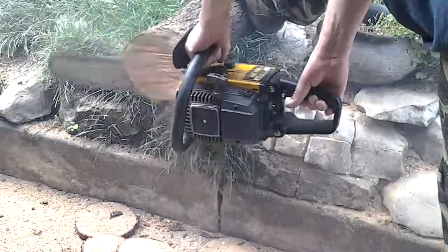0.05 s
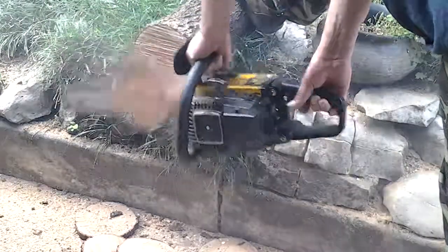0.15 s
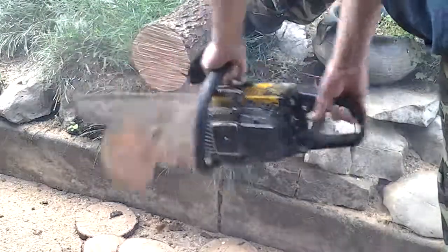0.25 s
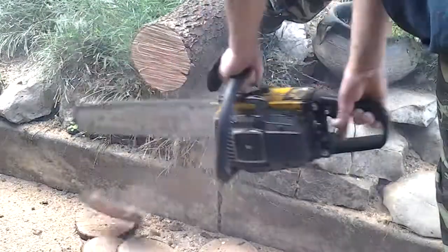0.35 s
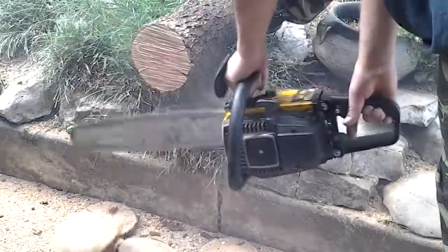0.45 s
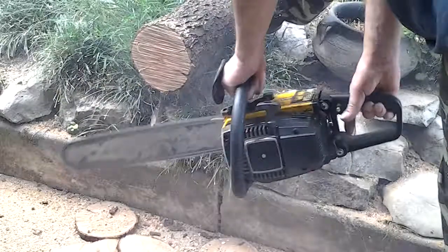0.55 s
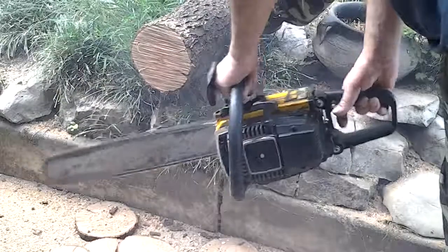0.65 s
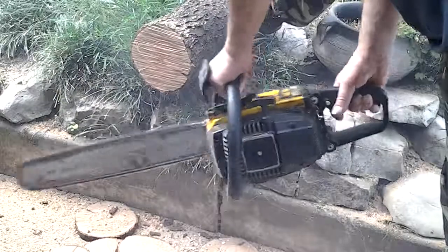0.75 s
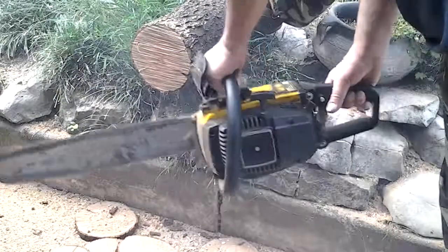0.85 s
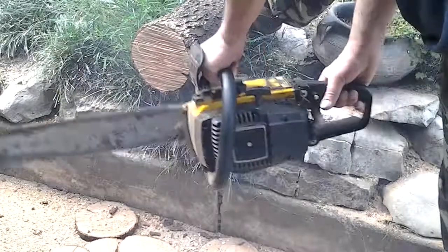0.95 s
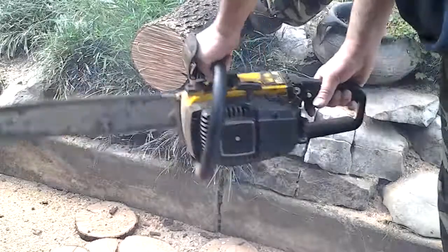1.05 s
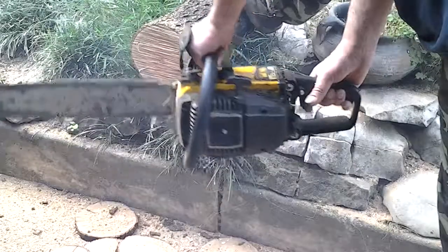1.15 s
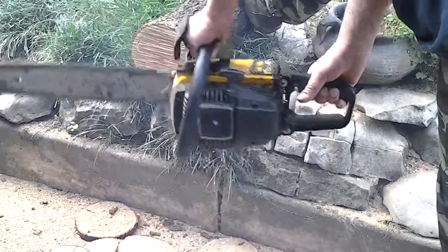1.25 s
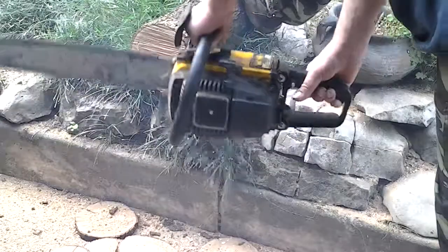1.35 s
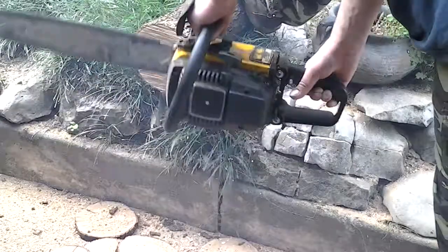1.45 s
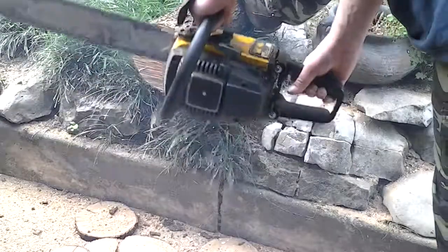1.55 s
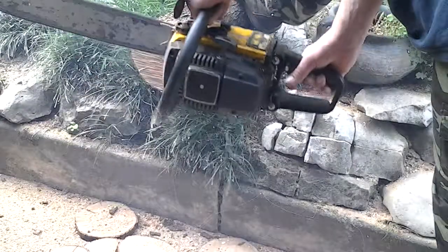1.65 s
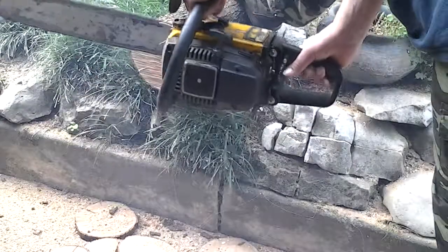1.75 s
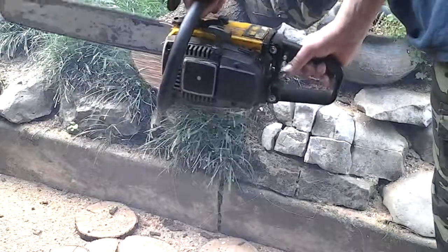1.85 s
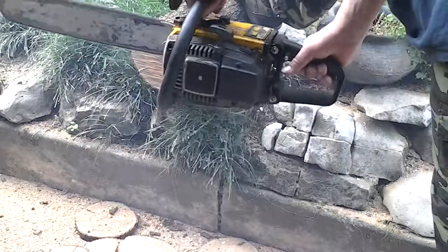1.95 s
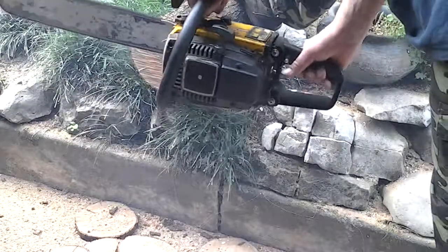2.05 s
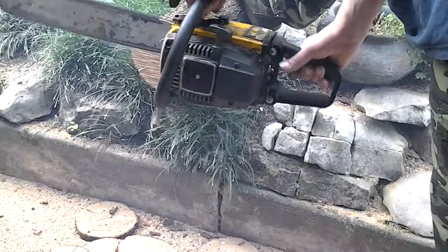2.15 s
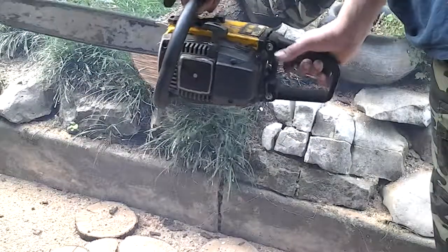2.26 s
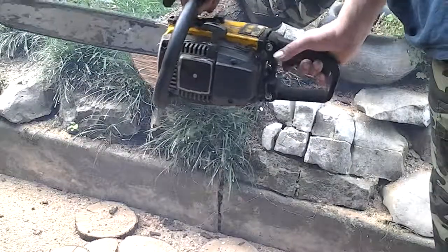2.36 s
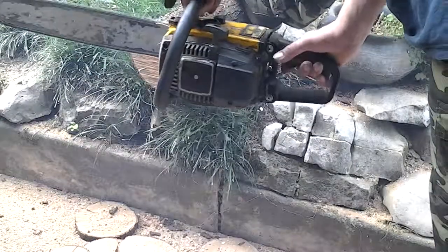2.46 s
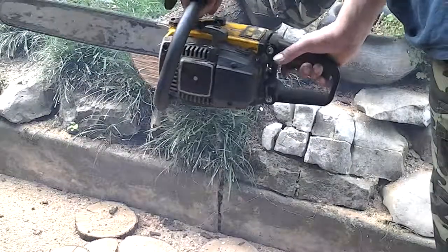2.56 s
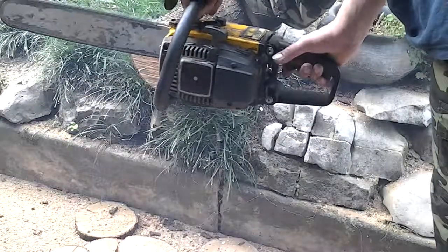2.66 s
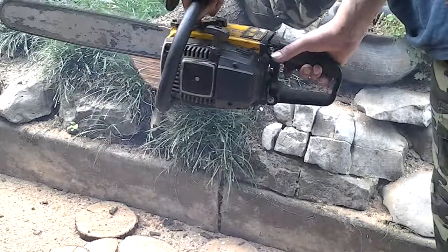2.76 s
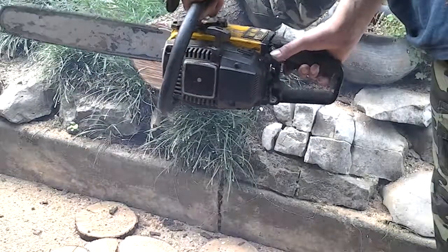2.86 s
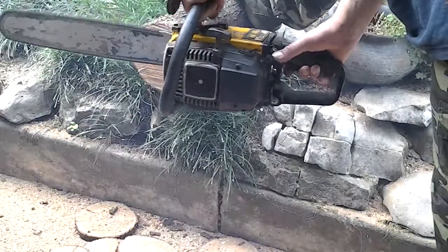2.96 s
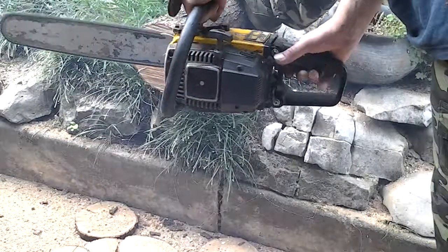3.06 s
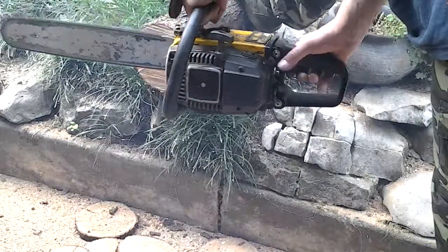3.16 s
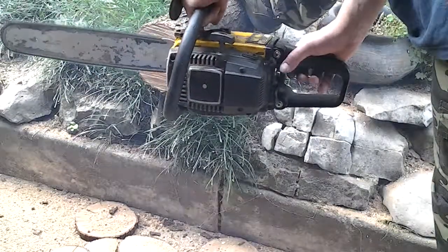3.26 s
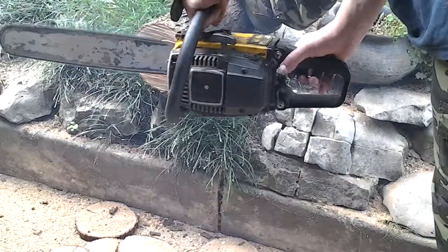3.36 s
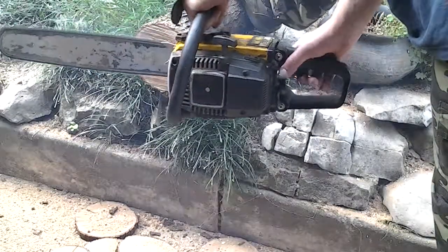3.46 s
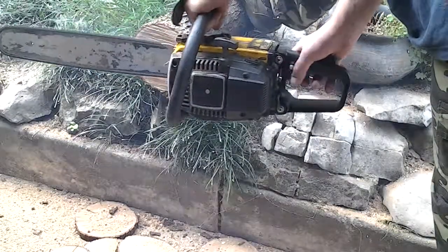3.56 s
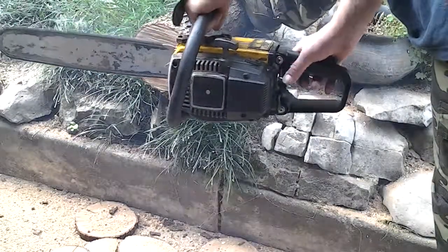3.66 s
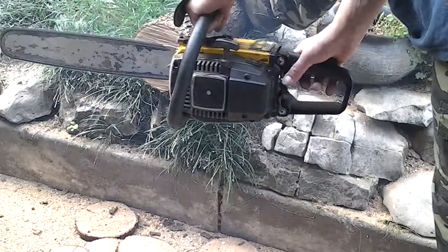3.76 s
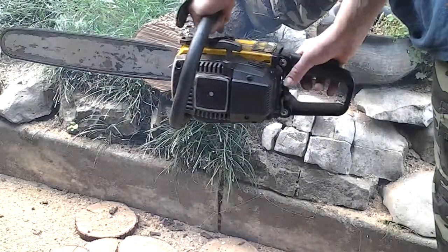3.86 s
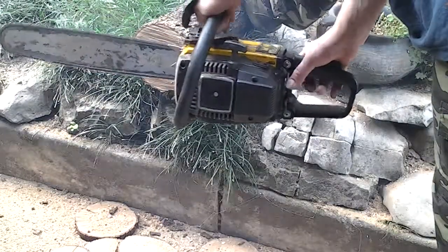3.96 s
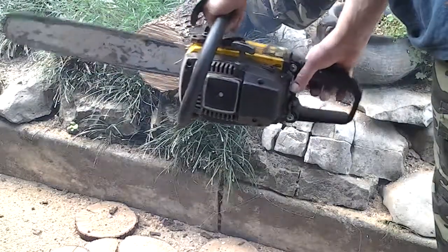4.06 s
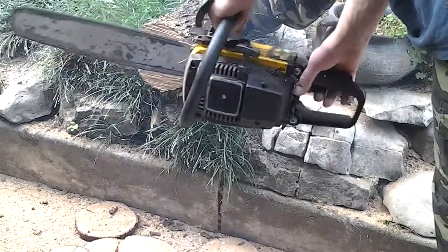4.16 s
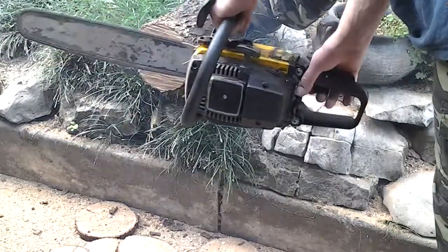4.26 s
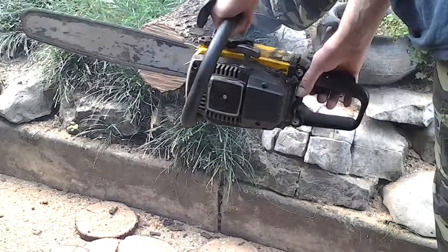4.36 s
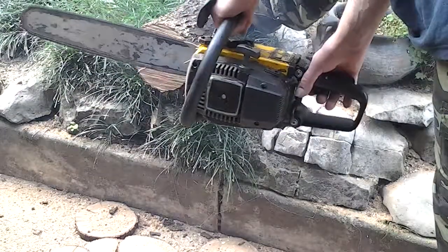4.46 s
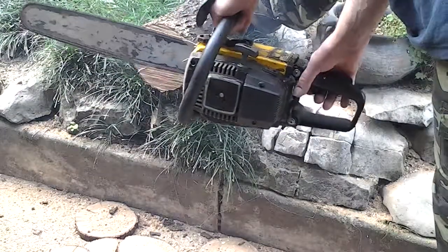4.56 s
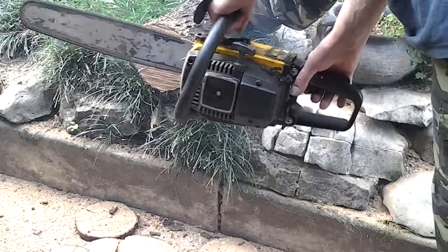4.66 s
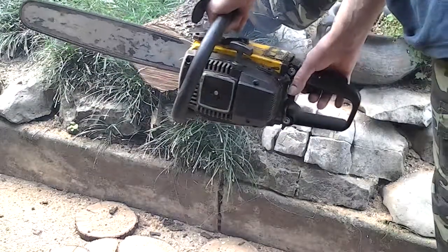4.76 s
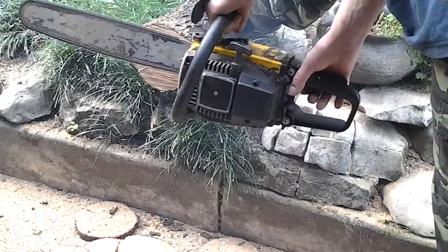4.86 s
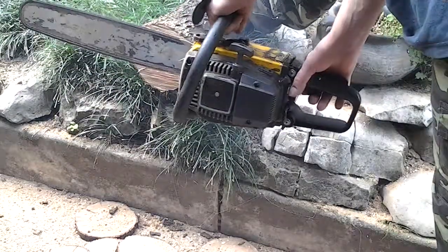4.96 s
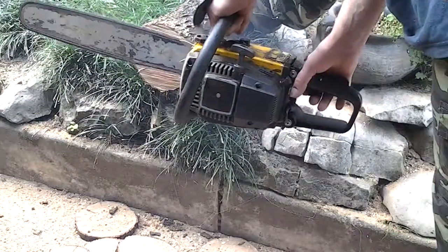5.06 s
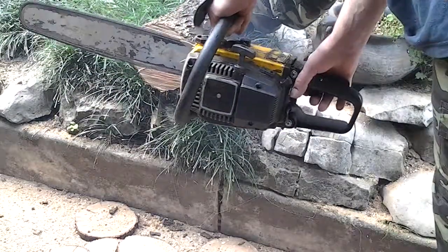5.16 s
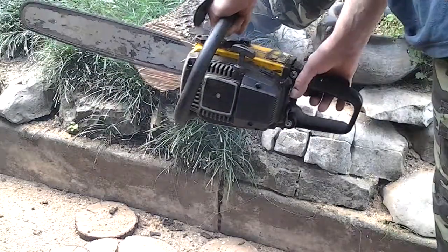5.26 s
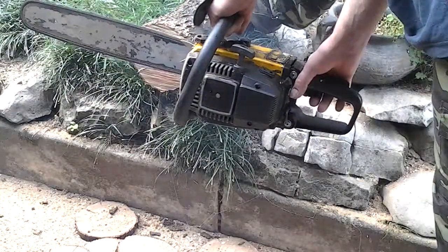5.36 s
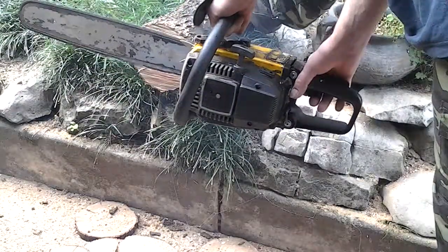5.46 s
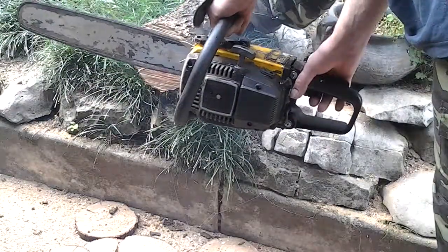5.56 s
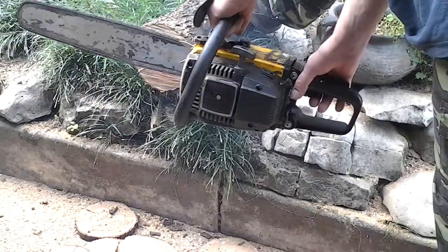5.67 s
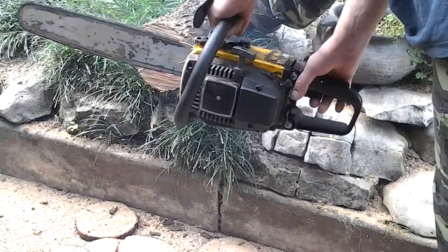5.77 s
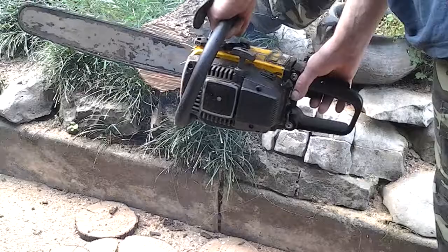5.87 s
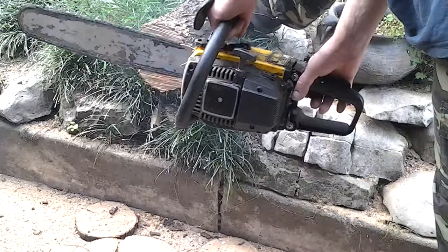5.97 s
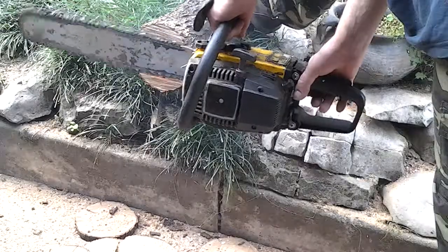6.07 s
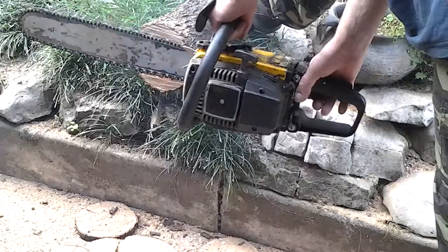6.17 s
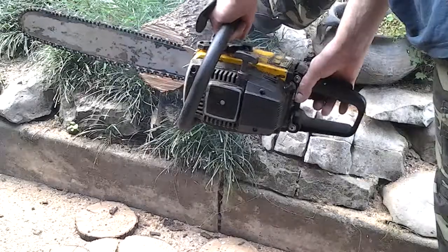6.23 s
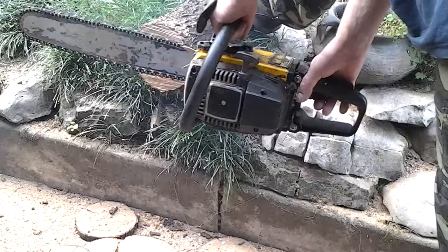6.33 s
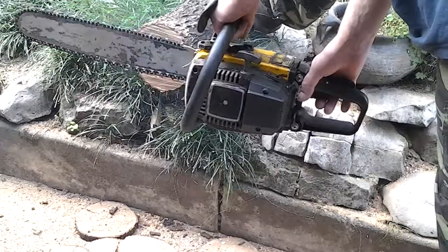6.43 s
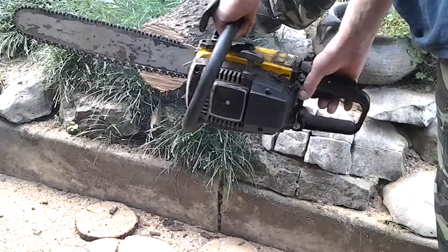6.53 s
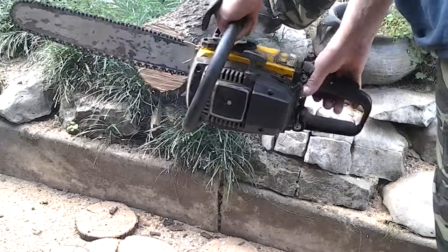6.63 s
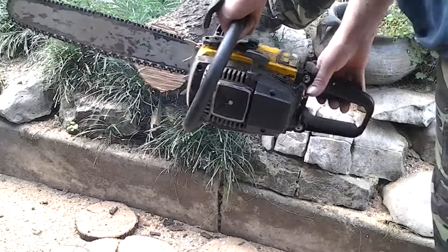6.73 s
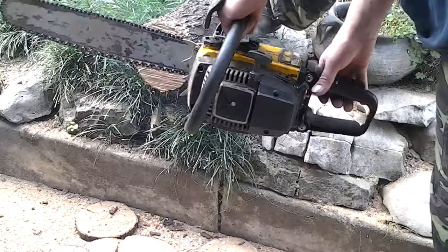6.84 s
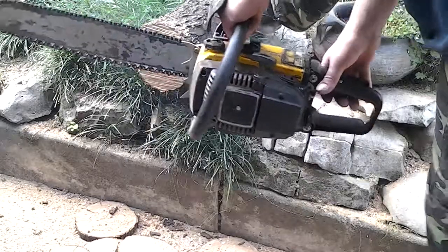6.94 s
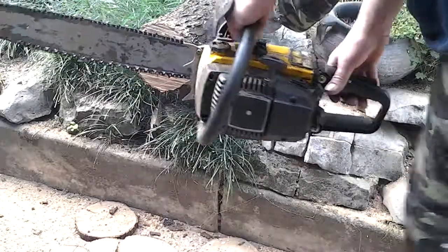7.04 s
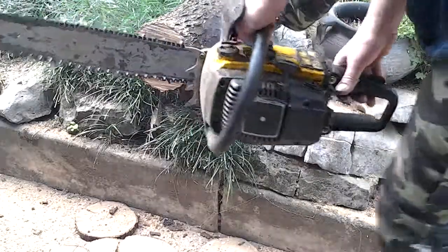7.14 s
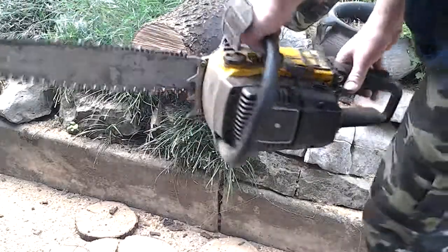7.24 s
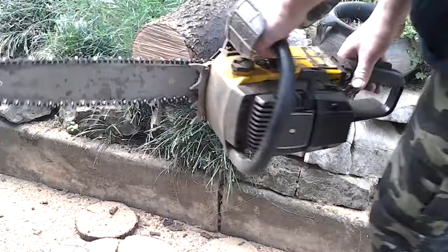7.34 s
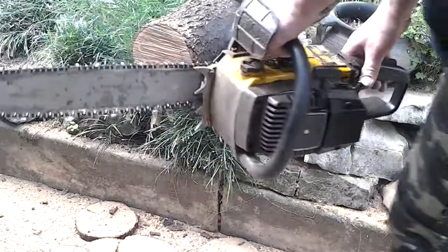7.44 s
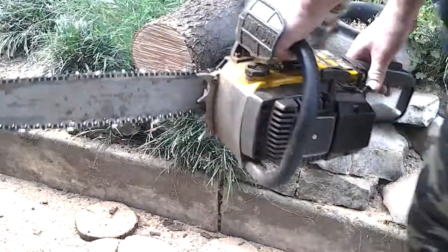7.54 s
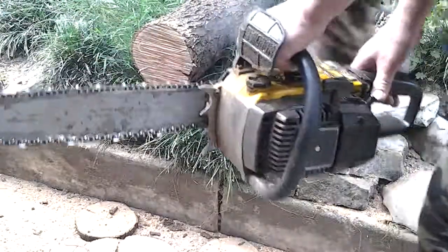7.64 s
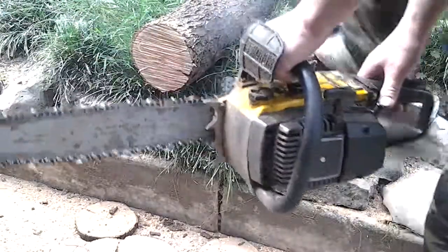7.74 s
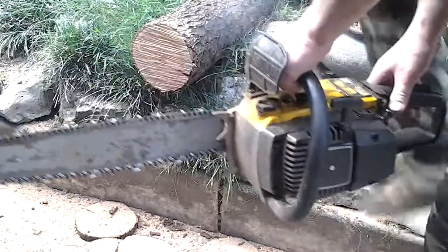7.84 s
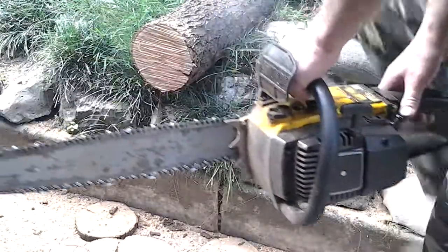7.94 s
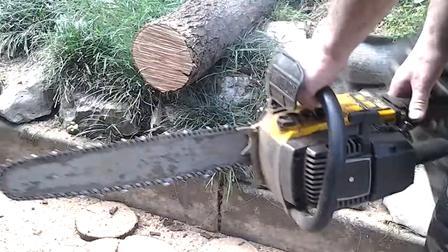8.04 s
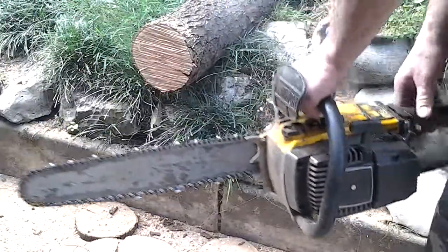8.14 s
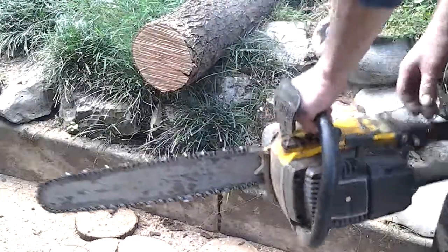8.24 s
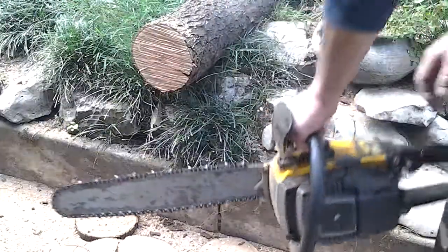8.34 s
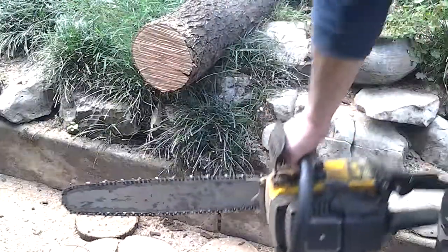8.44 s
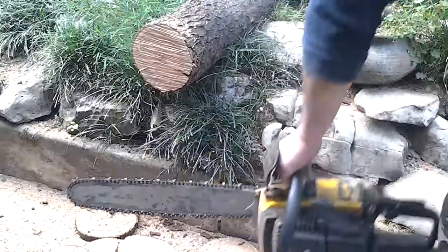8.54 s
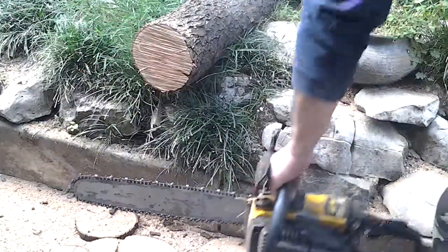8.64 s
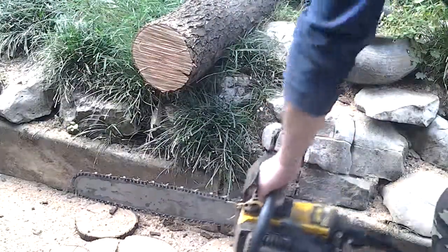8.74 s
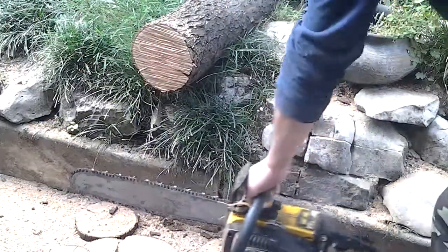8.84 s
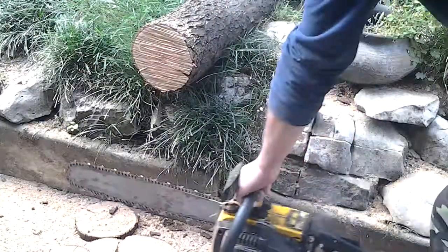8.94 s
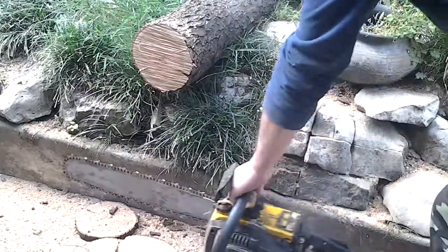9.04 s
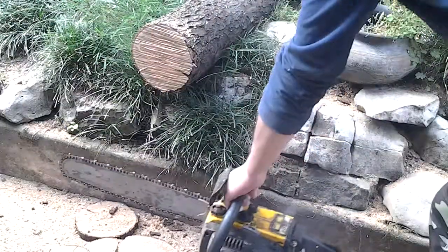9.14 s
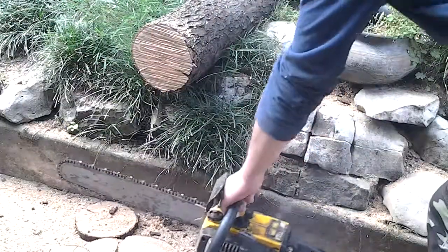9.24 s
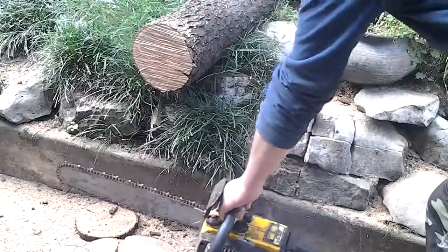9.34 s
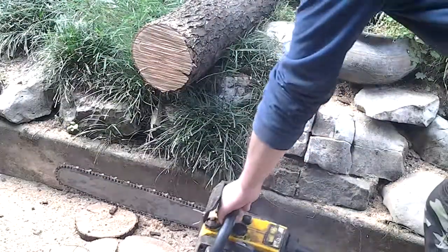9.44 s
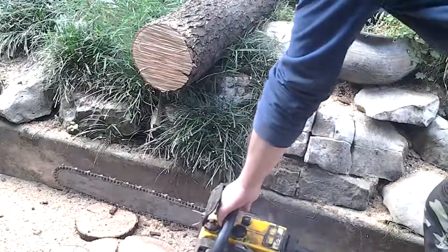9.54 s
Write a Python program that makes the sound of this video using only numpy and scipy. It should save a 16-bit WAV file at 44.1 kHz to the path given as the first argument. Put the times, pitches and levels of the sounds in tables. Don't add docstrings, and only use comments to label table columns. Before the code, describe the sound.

A small two-stroke chainsaw roars through three throttle blips, coasts to a lumpy idle, cuts out with a metallic clank, then is set down on stone.

```python
import sys
import numpy as np
from scipy import signal
from scipy.fft import rfft, irfft
from scipy.io import wavfile
from scipy.ndimage import uniform_filter1d

SR = 44100
rng = np.random.default_rng(int(sys.argv[2]) if len(sys.argv) > 2 else 0)


def output_pcm(signal):
    pcm = np.clip(np.atleast_2d(signal).T, -1, 1) * 32767
    wavfile.write(sys.argv[1], SR, np.round(pcm).astype(np.int16))


def invert_db(level):
    return 10 ** (np.asarray(level, dtype=float) / 20)


N = 423360

# t/s, speed/(turns per s)
SPEED = [(0.0, 148), (0.048, 150.9), (0.138, 174.7), (0.164, 176.1), (0.198, 175.6), (0.36, 156.5),
         (0.738, 120.1), (1.044, 94.2), (1.28, 76), (1.392, 111.8), (1.562, 171.6), (1.618, 170.5),
         (1.98, 130.5), (2.134, 180), (2.192, 180.5), (2.44, 150.4), (2.74, 122.5), (3.02, 100),
         (3.3, 79.8), (3.72, 55.2), (4.05, 42.5), (4.35, 37.9), (4.7, 38.6), (5.8, 37.2)]
# from t/s, to t/s, burning at first/dB, at last/dB
BLIPS = [
    (-.1, 0.189, -13.5, -8.5),
    (1.258, 1.624, -17.5, -12),
    (1.881, 2.18, -16, -11),
]
INERTIA_S, SWITCH_OFF_S, STOP_S, RUNDOWN = .012, 5.84, 6.1, 88
# speed/(turns per s), pumping/dB, silencer box share/dB, port snap share/dB,
# rebound as the ports shut/dB
PUMP_BY_SPEED = [(20, -53.5, 6.5, -11, -5.5), (33.4, -36.5, 17, -8, -7), (38.7, -26.5, 10, 1, 0.5),
                 (60, -20, 0.5, -5, -8), (85, -20, -1.5, -4, -7), (140, -24, -0.5, 1.5, -31),
                 (178, -21, -5, -6.5, -13)]
# f/Hz, width/Hz, level/dB, polarity, left minus right/dB
PUMP_MODES = [(560, 22, 0, 0.69, -3), (608.7, 31, 11.5, 0.63, -5.5), (708, 49, 10.5, 0.22, -16),
              (850, 69, -4, 0.89, -18)]
# f/Hz, width/Hz, level/dB, polarity, left minus right/dB
BOX_MODES = [(195, 4.3, -43.5, 0.81, -3), (206, 27, -12, -0.14, -2), (323.6, 120, -3, -0.9, -8),
             (360.4, 107, 3, 0.73, -7), (454, 185, 4, -0.8, -6.5)]
# f/Hz, width/Hz, level/dB, polarity, left minus right/dB
SNAP_MODES = [(1020, 36, -6, 0.45, 13), (1380, 190, 4, 0.93, 1.5), (1590, 120, 7, 0.7, 1),
              (1900, 580, 6.5, 1, -8.5), (2290, 1400, -2, 0.66, -22.5)]
# f/Hz, width/Hz, level/dB, polarity, left minus right/dB
EDGE_MODES = [(880, 350, 0, -1, -3), (1250, 400, -2, 1, -2), (1900, 600, 0, -1, -3), (2850, 600, -2, 1, -5),
              (3500, 500, -3, -1, -7)]
GROUND_LAG_MS, SNAP_THROTTLE_DB = 5.525, -9.5
# t/s, echo lag/ms, echo level/dB
KERB = [(0, 1.6, -17.5), (.4, 2.2, -7.5), (.6, 1.63, -15), (.9, 1.7, -5), (1.1, 2.44, -12),
        (1.6, 2.05, -10), (1.8, 2.35, -4), (2.1, 2.35, -15), (2.45, 2.3, -3), (2.6, 2.8, -5),
        (2.8, 1.57, -12), (3.2, 2.4, -16.5), (6, 1.1, -20.5)]
# f/Hz, width/Hz, level/dB, polarity, left minus right/dB
BURN_MODES = [(179.7, 55, -19.5, 5.5, 0.5), (306, 170, -15, -6.5, -9.5), (610, 160, -8.5, 3, -2.5),
              (1050, 910, 6, 11, -10.5), (1400, 170, -4.5, 2.5, 0), (2300, 1500, -7, 6.5, -8.5)]
# f/Hz, width/Hz, level/dB, polarity, left minus right/dB
PIPE_MODES = [(873, 130, -3, 0.73, -5), (890, 110, 0.5, -0.24, -6.5), (790, 150, -8, -0.07, -8)]
# f/Hz, width/Hz, level/dB, polarity, left minus right/dB
BARK_MODES = [(1053, 95, -1, 0.87, -4), (1280, 130, 6.5, -0.71, -1.5), (1500, 140, -9, 0.67, -1),
              (2150, 110, -9.5, -1, -8)]
# pipe at first/dB, at last/dB, bark at first/dB, at last/dB
BLIP_TONE = [
    (-17, -10, -4.5, 0),
    (5.5, -6.5, -7.5, 3),
    (-3, 2.5, -3, -3),
]
# t/s, level/dB
BACKFIRES = [
    (0.154, -9.5),
    (0.174, -12),
    (0.357, -21.5),
    (1.288, -15),
    (1.301, -17.5),
    (1.312, -16),
    (1.374, -15.5),
    (1.41, -20),
    (1.987, -11.5),
]
# f/Hz, width/Hz, share/(0-1)
DEAD_SPOTS = [(275, 21, 0), (504.4, 21, 0.9), (745, 30, .6)]
# t/s, peak level/dB
POPS = [(3.653, -10.7), (3.7431, -8.9), (3.7992, -12.1), (3.8394, 0.8), (3.8794, -9.9), (3.9006, -9.3),
        (4.011, -9.7), (4.034, -13.6), (4.0581, -0.8), (4.1524, -1.6), (4.251, -1.9), (4.3031, -0.8),
        (4.3821, 0.5), (4.4347, -13.3), (4.4627, 0.8), (4.5684, 1.4), (4.6716, -1.7), (4.699, -3.6),
        (4.8037, 3.1), (4.907, 3.1), (4.9306, -13.3), (4.9835, -3.3), (5.0108, 0.2), (5.0636, 0.9),
        (5.1404, 2.2), (5.219, -2.2), (5.296, -3.4), (5.3226, -1.6), (5.3491, -0.0), (5.4014, -5.7),
        (5.4281, -8.6), (5.4555, -12.0), (5.5105, -0.1), (5.592, 4.0), (5.6424, -12.5), (5.6701, -0.8),
        (5.7207, -8.8), (5.7483, -3.9), (5.775, -5.3), (5.8016, 2.0), (5.8816, -18), (5.9486, -24),
        (5.9876, -24), (6.0296, -30)]
# f/Hz, width/Hz, level/dB, polarity, left minus right/dB
POP_MODES = [(372, 88, -2.3, -1, -8), (439, 20, -18, -1, -6), (583, 82, 0, 1, -4.5), (300, 20, -23, 1, -6),
             (185, 50, -23, -1, -3)]
# speed/(turns per s), port opening/dB, intake breathing/dB
CHUFF = [(16, -22, -26), (26, -10, -17), (37, -5, -12.5), (46, -4.5, -12), (52, -6.5, -14), (58, -16, -24),
         (64, -45, -50)]
# f/Hz, width/Hz, level/dB, polarity, left minus right/dB
INTAKE_MODES = [(496, 248, 0, -1, -5)]
# t/s, level/dB
CRACKS = [(3.84, -6), (4.059, -7.5), (4.153, -5.5), (4.303, -5.5), (4.38, -6), (4.464, 0), (4.57, -2),
          (4.802, 1.5), (4.905, 1.5), (5.012, -2.5), (5.063, -4.5), (5.141, -4), (5.218, -4),
          (5.295, -10.5), (5.351, -11), (5.51, -4.5), (5.593, -0.5), (5.671, -4), (5.75, -10), (5.802, -2)]
# f/Hz, width/Hz, level/dB, polarity, left minus right/dB
OUTLET_MODES = [(1180, 70, -2, 0.96, -1), (1670, 300, -9, 0.92, 2.5), (4450, 1300, -3, 1, -5.5),
                (8500, 4000, -13, 0.94, -11.5)]
# speed/(turns per s), clatter/dB, top end against it/dB, middle against it/dB
CLATTER = [(14.89, -36, -13, -4), (22.7, -26.5, -15, -1), (37.2, -21, -18, -3.5), (42.4, -18.5, -16, -4.5),
           (82, -14.5, -16.5, -5), (125, -14, -15.5, -7), (186, -11, -16.5, -5.5)]
MIDDLE_THROTTLE_DB = 1.5
# f/Hz, level/dB per Hz
FAST_COLOUR = [(150, -62), (300, -38), (700, -27), (1300, -22), (2520, -12), (3450, -3), (5370, -8),
               (9900, -19), (11000, -24), (11600, -30), (14400, -33), (15400, -90)]
# f/Hz, level/dB per Hz
IDLE_COLOUR = [(100, -40), (250, -21), (600, -16.5), (970, -25), (1340, -25.5), (2860, -22), (4090, -18),
               (8370, -35), (10800, -38.5), (12500, -70), (15400, -98)]
# f/Hz, width less 60/Hz, running part/dB (fades out at idle), idle
# part/dB (counts 1.5 times at idle, half when fast)
METAL = [(1560, 96, -25.5, -16.5), (2186, 5.8, -13.5, -11.5), (2760, 37, -28, -19), (3170, 66, -10, -22.5),
         (3460, 330, 5, -12.5), (4000, 80, -5, -14), (3870, 100, -1, -15.5), (4600, 99, -0.5, -14),
         (6900, 60, -21, -17.5), (8350, 38, -31, -33)]
# f/Hz, likeness/(0-1)
SAME = [(60, 0.36), (150, 0.41), (380, 0.3), (950, 0.27), (2380, 0.6), (5970, 0.11), (15000, 0.27)]
# f/Hz, left minus right/dB
LEAN = [(60, -4.5), (130, -1), (290, -20.5), (640, -21), (1410, -12), (3090, 0), (6800, -15), (15000, -13)]
# t/s, level/dB
GARDEN = [
    (6.2, -34),
    (6.33, -43),
    (6.75, -43),
    (7.5, -55),
    (8.1, -59),
    (8.5, -44.5),
    (8.97, -56.5),
    (9.3, -48),
    (9.6, -57),
]
# f/Hz, level/dB per Hz
QUIET = [(15, -24), (25, -1), (75, 1.5), (122, -2), (156, 3), (198, -10), (581, -9), (869, -12.5),
         (2910, -28.5), (10000, -23.5), (12800, -22.5), (14200, -23.5), (15400, -57)]
HUM_DB = -57.5
# f/Hz, level/dB per Hz
RUSTLE = [(180, -36.5), (300, -6), (545, -3.5), (594, -7), (685, -6.5), (1060, -11), (3280, -7.5),
          (5960, -17.5), (9000, -35), (11700, -60.5), (19800, -120)]
# f/Hz, width/Hz, level/dB, polarity, left minus right/dB
RATTLE_MODES = [(1436, 21, -12.5, 0.88, -0.5), (2160, 59, -7.5, 0.92, -4.5), (2800, 46, -14.5, 0.97, -5),
                (3090, 50, -4, 0.88, -5), (3200, 95, -10, 0.94, -1.5), (3530, 38, -3, 1, 0.5),
                (3870, 67, -5.5, 0.99, -7), (4080, 25, -2.5, 1, -1.5), (4550, 45, -6.5, 0.94, -13)]
RATTLE_DB, TAPS_PER_S = -31, 1300
# t/s, peak level/dB
CLANK = [
    (6.052, -20),
    (6.069, -16.5),
    (6.101, -11.5),
    (6.105, 8.5),
    (6.111, 7.5),
    (6.117, 0),
    (6.122, -2),
    (6.141, -24),
    (6.154, -30.5),
    (6.18, -35),
]
# f/Hz, level/dB per Hz
CLANK_COLOUR = [(59, -53.5), (100, -26), (507, -17.5), (695, -12.5), (934, -22), (1370, -8), (1520, -13),
                (2460, -13), (3170, -2), (6640, -15.5), (8370, -14.5), (9300, -33), (15400, -39.5)]
# f/Hz, level/dB, time to fall about 26 dB/s
BAR = [(1680, -12, 0.12), (2020, -5.5, 0.11), (3170, -12.5, 0.13), (3060, -19, 0.2), (3120, -1.5, 0.1),
       (4300, -10.5, 0.12), (4150, -13, 0.073), (4870, -3.5, 0.12), (5500, -21.5, 0.22), (5800, -3, 0.052),
       (7360, -24.5, 0.2)]
# f/Hz, level/dB, t60/s, from t/s, drops 10 dB at t/s
LINGER = [
    (2085, -43, 1.6, 6.2, 6.32),
    (4850, -29, .6, 6.14, 6.243),
    (8200, -11, .12, 6.103, 6.15),
    (8205, -46, .5, 6.16, 6.28),
]
# f/Hz, width/Hz, level/dB, polarity, left minus right/dB
THUMP_MODES = [(70, 40, -1, 0.82, -2.5), (140, 60, -6.5, 0.94, -5), (263, 78, -4.5, 1, -5)]
# t/s, peak level/dB, gritty tail t60/s, brightness/dB per octave, left minus right/dB
KNOCKS = [(7.353, -36, 0.35, 5.5, -5), (7.394, -43, 0.17, -9, -4.5), (8.139, -41.5, 0.5, 0, -4),
          (8.352, -14.5, 0.35, 2.5, -4), (8.371, -25.5, 0.27, -5.5, -1), (8.41, -22, 0.48, -2.5, -4),
          (8.447, -27, 0.054, -1, -5), (8.451, -24.5, 0.12, -0.5, -2), (8.472, -35, 0.5, 14, -7),
          (8.496, -39, 0.08, 10, -7), (8.512, -41, 0.093, 6, -6), (8.578, -35.5, 0.28, 7, -8),
          (8.696, -46, 0.35, 1, -1), (8.919, -43, 0.16, 17, -7), (9.139, -44, 0.2, 2, -6),
          (9.182, -46, 0.1, 2, -6), (9.264, -48, 0.1, 0, -5), (9.578, -47, 0.15, 1, -5.5),
          (9.316, -36, 0.11, 7, -10), (9.322, -26.5, 0.17, 16.5, -13), (9.325, -21.5, 0.065, -3, -8),
          (9.328, -28, 0.21, -4, 1), (9.349, -45, 0.15, -2, -2.5), (9.388, -39, 0.24, 16, -10)]
# f/Hz, level/dB per Hz
KNOCK_COLOUR = [(88, -51), (150, -19), (178, -25), (451, -4.5), (647, -14), (753, 2), (928, -9), (1100, 0),
                (1310, -1), (2060, -1), (4930, -3.5), (8000, -23.5), (10500, -36), (14000, -41.5)]
# t/s, level/dB, f/Hz, width/Hz
PINGS = [(8.353, -14, 2300, 500), (8.375, -33, 1100, 200), (8.391, -28, 2000, 249), (8.412, -27, 2150, 90),
         (8.414, -29, 785, 120), (8.447, -22, 3430, 400), (8.453, -26, 3430, 120), (8.472, -26, 4040, 350),
         (8.485, -36, 5300, 400), (8.497, -33, 3970, 70), (8.55, -41, 1950, 250), (8.579, -37, 5000, 299),
         (8.581, -35, 4200, 120.5)]


def evened(x):
    return x / np.sqrt(np.mean(x ** 2) + 1e-20)


def read(points, hz):
    f, value = np.transpose(points)
    return np.interp(np.log(hz + 1), np.log(f + 1), value)


def curves(rows, t):
    s, *columns = np.transpose(rows)
    return [np.interp(t, s, c) for c in columns]


def strikes(s, size):
    at = np.clip(s * SR, 0, N - 2)
    i = at.astype(int)
    return np.bincount(i, size * (1 - at + i), N) + np.bincount(i + 1, size * (at - i), N)


def lean(db, left_db):
    return invert_db(db + np.array([[.5], [-.5]]) * left_db)


def ring(clicks, modes, rise, cut_hz):
    t = np.arange(8192) / SR
    body = 0
    for hz, width, db, sign, lean_db in modes:
        mode = np.exp(-np.pi * width * t) * np.sin(2 * np.pi * hz * t) * (1 - np.exp(-t / rise))
        thin = signal.butter(6, min(cut_hz, .85 * hz), "highpass", fs=SR, output="sos")
        body = body + sign * lean(db, lean_db) * signal.sosfilt(thin, mode)
    return signal.oaconvolve(clicks[None], body / abs(body.mean(0)).max(), axes=1)[:, :N]


def noise(field_db, same, patchy_db):
    hz, t = np.fft.rfftfreq(512, 1 / SR), np.arange(N // 128 + 5) * 128 / SR
    a, b, c, d, patches = rng.standard_normal((len(t), len(hz), 5)).T
    patches = evened(uniform_filter1d(uniform_filter1d(patches, size=5, axis=0), size=12, axis=1))
    same, left = np.clip(same(hz), -1, 1)[:, None], a + 1j * b
    z = np.array([left, same * left + np.sqrt(1 - same ** 2) * (c + 1j * d)])
    level = invert_db(field_db(hz, t) + patchy_db * patches)
    return signal.istft(z * level, nperseg=512, noverlap=384)[1][:, :N]


def speed(t):
    lit = np.mean([curves(SPEED, t + k * INERTIA_S)[0] for k in (-1, 0, 1)], 0)
    return lit - RUNDOWN * np.clip(t - SWITCH_OFF_S, 0, STOP_S - SWITCH_OFF_S)


def throttle(t):
    return np.array([np.clip(np.minimum(t - a, b - t) / .03, 0, 1) for a, b, _, _ in BLIPS])


def crank():
    t = np.arange(N) / SR
    turns = np.cumsum(speed(t) * (t < STOP_S)) / SR
    s = np.transpose(POPS)[0]
    slip = np.unwrap(np.interp(s, t, turns) % 1, period=1)
    return turns - np.interp(t, s, slip)


def turn_times(turns, phase):
    count = np.arange(np.ceil(turns[0]), turns[-1])
    return np.interp(count + phase, turns, np.arange(N) / SR)


def pumping(turns, uneven):
    t = np.arange(N) / SR
    opens, shuts = turn_times(turns, 0), turn_times(turns, 0.32)
    pump_db, box_db, snap_db, rebound_db = curves(PUMP_BY_SPEED, speed(opens))
    snap_db = snap_db + SNAP_THROTTLE_DB * throttle(opens).sum(0)
    per_turn = np.sqrt(100 / speed(opens))
    pump = per_turn * invert_db(pump_db + .7 * uneven[0])
    lope = 1.2e-5 * per_turn ** 5
    opening, closing = opens + lope * uneven[3], shuts + 4 * lope * uneven[1]
    lag_ms, echo_db = curves(KERB, opens)

    def puffs(db):
        size = pump * invert_db(db)
        direct = strikes(opening, size) - strikes(closing, size * invert_db(rebound_db))
        kerb = strikes(opening + lag_ms / 1000, size * invert_db(echo_db))
        kerb = kerb - strikes(closing + lag_ms / 1000, size * invert_db(rebound_db + echo_db))
        return direct + kerb + strikes(opening + GROUND_LAG_MS / 1000, size * invert_db(-9.5))

    pumped = invert_db(10) * ring(puffs(0), PUMP_MODES, rise=.0006, cut_hz=400)
    pumped = pumped + invert_db(8) * ring(puffs(box_db), BOX_MODES, rise=.0008, cut_hz=290)
    slow_db = -14 * np.clip(per_turn - 1.05, 0, .6)
    snapped = invert_db(14) * ring(puffs(snap_db + slow_db), SNAP_MODES, rise=.0002, cut_hz=800)
    edges = strikes(opening, pump * np.clip(2 * (1.3 - per_turn), 0, 1))
    snapped = snapped + invert_db(19) * ring(edges, EDGE_MODES, rise=.0001, cut_hz=490)
    covered = np.clip((turns % 1 - .62) / .2, 0, 1) * np.clip((60 - speed(t)) / 18, 0, 1)
    idle = np.clip((57 - speed(t)) / 14, 0, 1)
    return pumped * invert_db(-7 * uniform_filter1d(covered, size=30) - 18 * idle) + snapped


def burning(turns, uneven):
    opens = turn_times(turns, 0)
    per_turn = np.sqrt(100 / speed(opens))
    ragged_db = 2.1 * per_turn ** 5 * uneven[2]
    moment = opens + 3e-5 * per_turn ** 3 * uneven[4]

    def burns(ends_db):
        burn = 0
        for (a, b, first_db, last_db), held, extra_db in zip(BLIPS, throttle(opens), ends_db):
            burn = burn + held * invert_db(np.interp(opens, (a, b), np.add((first_db, last_db), extra_db)))
        return strikes(moment, per_turn * burn * invert_db(ragged_db))

    tone_db = np.array(BLIP_TONE)
    late_s, late_db = np.transpose(BACKFIRES)
    late = strikes(late_s, invert_db(late_db))
    burnt = invert_db(11.5) * ring(burns(0 * tone_db[:, :2]) + late, BURN_MODES, rise=0.00012, cut_hz=300)
    burnt = burnt + invert_db(8.5) * ring(burns(tone_db[:, :2]) + .7 * late, PIPE_MODES, rise=0.00025, cut_hz=340)
    return burnt + invert_db(3.5) * ring(burns(tone_db[:, 2:]) + late, BARK_MODES, rise=0.00018, cut_hz=590)


def side_chambers(x):
    for hz, width, share in DEAD_SPOTS:
        x = x - np.clip(share, 0, 1) * signal.lfilter(*signal.iirpeak(hz, hz / width, SR), x)
    return x


def idling(turns, uneven):
    opens = turn_times(turns, 0)
    open_db, intake_db = curves(CHUFF, speed(opens))
    s, peak_db = np.transpose(POPS)
    chuffs = strikes(opens, invert_db(open_db + 1.8 * uneven[0]))
    popped = ring(strikes(s, invert_db(peak_db)) + chuffs, POP_MODES, rise=.004, cut_hz=215)
    gulps = strikes(turn_times(turns, .67), invert_db(intake_db + 1.5 * uneven[2]))
    popped = popped + ring(gulps, INTAKE_MODES, rise=.004, cut_hz=215)
    s, peak_db = np.transpose(CRACKS)
    return popped + invert_db(-5) * ring(strikes(s, invert_db(peak_db)), OUTLET_MODES, rise=0.00048, cut_hz=510)


def walls(x):
    at = np.arange(130, 9000, 22) + rng.integers(0, 22, 404) + rng.integers(0, 30, (2, 404))
    taps = np.zeros((2, 9100))
    np.put_along_axis(taps, at, rng.choice([-1., 1.], at.shape[1]) * invert_db(-60 * at / SR / 0.27), 1)
    return signal.oaconvolve(x, taps / np.linalg.norm(taps[0]), axes=1)[:, :N]


def clatter(turns):
    def field_db(hz, t):
        level_db, top_db, middle_db = curves(CLATTER, speed(t))
        middle_db = middle_db + MIDDLE_THROTTLE_DB * throttle(t).sum(0)
        fast = np.clip((speed(t) - 40) / 50, 0, 1)
        colour = np.outer(read(FAST_COLOUR, hz), fast) + np.outer(read(IDLE_COLOUR, hz), 1 - fast)
        power = invert_db(colour) ** 2
        for f, width, fast_db, idle_db in METAL:
            peak = 1 / (1 + (2 * (hz - f) / (width + 60)) ** 2) ** 2
            power = power + np.outer(peak, invert_db(fast_db * fast + idle_db * (1.5 - fast)) ** 2)

        def share(lo, hi):
            return 10 * np.log10(power[(hz > lo) & (hz < hi)].sum(0))

        core_db = share(2500, 6000)
        top = np.clip(np.log2(hz / 5500 + 1e-9) * 3, 0, 1)[:, None]
        top = top * (top_db - share(6500, 12000) + core_db)
        middle = np.clip(np.log2(2700 / (hz + 1)) * 4, 0, 1)[:, None]
        middle = middle * (middle_db - share(1500, 2400) + core_db - 5)
        sides = read(LEAN, hz)[:, None] * np.array([.5, -.5])[:, None, None]
        return 10 * np.log10(power) - core_db + level_db + top + middle + sides - 90 * (t > STOP_S)

    hiss = noise(field_db, lambda hz: read(SAME, hz), patchy_db=1.5)
    hiss = signal.sosfilt(signal.butter(6, 230, "highpass", fs=SR, output="sos"), hiss)
    depth = np.clip(2.6 - speed(np.arange(N) / SR) / 32, .5, 1.5)
    beat_db = 1.1 * depth * np.cos(2 * np.pi * (turns + 0.041))
    s, peak_db = np.transpose(POPS)
    jolts = strikes(s, invert_db(peak_db))
    shake = 1 + .9 * signal.lfilter([1], [1, -np.exp(-1 / (.007 * SR))], jolts)
    ticks = invert_db(1.6 * np.minimum(rng.exponential(1, N), 5)) * (rng.random(N) < 700 / SR)
    grain = 2.4 + signal.lfilter([1], [1, -np.exp(-1 / (0.016 * SR))], 0.058 * ticks)
    return invert_db(3.0) * hiss * shake * invert_db(beat_db) * evened(grain)


def garden():
    def field_db(hz, t):
        rustle_db = curves(GARDEN, t)[0]
        power = invert_db(read(QUIET, hz) + HUM_DB)[:, None] ** 2
        power = power + np.outer(invert_db(read(RUSTLE, hz)), invert_db(rustle_db - 13.0)) ** 2
        return 10 * np.log10(power) + np.array([-1.5, 1.5])[:, None, None]
    return noise(field_db, lambda hz: .3 * (hz < 700), patchy_db=.8)


def rattle(turns):
    t = np.arange(N) / SR
    clump = invert_db(11.0 * np.cos(2 * np.pi * (turns + 0.088)))
    loose = np.clip((75 - speed(t)) / 35, 0, 1) * np.clip((speed(t) - 27) / 10, 0, 1) * (t < STOP_S)
    chance, size, which = rng.random((3, N))
    taps = loose * clump * invert_db(-3.0 * np.log(size + 0.00082)) * (chance < TAPS_PER_S / SR)
    part = (which * 3).astype(int)
    rung = sum(ring(taps * (part == k), RATTLE_MODES[k::3], rise=.0002, cut_hz=830) for k in range(3))
    return invert_db(RATTLE_DB) * rung


def burst(colour, tilt_db, t60, tick_db, rise):
    t, hz = np.arange(16384) / SR, np.fft.rfftfreq(16384, 1 / SR)
    shared, left, right, grit = rng.standard_normal((4, len(t)))
    decay = invert_db(-60 * t / t60 + 1.7 * evened(uniform_filter1d(grit, size=60)))
    spray = (shared + 1.7 * np.array([left, right])) * decay
    spray = spray * (1 + invert_db(tick_db - 60 * t / 0.016)) * (1 - np.exp(-t / rise))
    tone = invert_db(read(colour, hz) + tilt_db * np.log2(hz / 2500 + .01))
    out = irfft(rfft(np.roll(spray, 256, 1)) * tone)
    return out / abs(out.mean(0)).max()


def add(mix, s, sound):
    part = mix[:, round(s * SR) - 256:][:, :sound.shape[1]]
    part += sound[:, :part.shape[1]]


def clank():
    mix = np.zeros((2, N))
    for s, db in CLANK:
        blow = burst(CLANK_COLOUR, tilt_db=0.1, t60=.042, tick_db=-12, rise=.0012)
        add(mix, s, invert_db(db + np.array([[-3.5], [3.0]])) * blow)
    s, peak_db = np.transpose(CLANK)
    blows = strikes(s, invert_db(peak_db))
    leans_db = rng.normal(-15.5, 2.6, len(BAR))
    modes = [(hz, 0.94 / t60, db, 1, lean_db) for (hz, db, t60), lean_db in zip(BAR, leans_db)]
    early = ring(blows, modes, rise=.001, cut_hz=250)
    t = np.arange(N) / SR
    late = 0
    for hz, db, t60, s, damped in LINGER:
        level = invert_db(db - 60 * abs(t - s) / t60 - 10 * np.clip((t - damped) / .015, 0, 1))
        late = late + level * np.sin(2 * np.pi * hz * t) * np.clip((t - s) / 0.018, 0, 1)
    thump = invert_db(-36.5) * ring(blows, THUMP_MODES, rise=0.0023, cut_hz=40)
    return mix + invert_db(-27) * early + late + thump


def knocks():
    mix = np.zeros((2, N))
    for s, db, t60, tilt_db, lean_db in KNOCKS:
        blow = burst(KNOCK_COLOUR, tilt_db, max(t60, .02), tick_db=9.5, rise=0.00047)
        add(mix, s, lean(db, lean_db) * blow)
    return mix


def pings():
    mix, t = np.zeros((2, N)), np.maximum(np.arange(-256, 3000) / SR, 0)
    for s, db, hz, width in PINGS:
        note = np.exp(-np.pi * width * t) * np.sin(2 * np.pi * hz * t)
        add(mix, s, lean(db, -5) * note)
    return mix


def scene():
    turns = crank()
    uneven = rng.standard_normal((5, len(turn_times(turns, 0))))
    engine = side_chambers(pumping(turns, uneven) + burning(turns, uneven))
    idle = idling(turns, uneven)
    saw = engine + idle + invert_db(-8) * walls(engine + .25 * idle) + clatter(turns) + rattle(turns)
    saw[0] = np.roll(saw[0], 2)
    blows = clank() + knocks() + pings()
    return saw + blows + invert_db(-14) * walls(blows) + garden()


def starved(x):
    hz, _, z = signal.stft(x, SR, nperseg=2048)
    power = abs(z) ** 2
    band = np.repeat(power[:, :1024].reshape(2, 64, 16, -1).sum(2), 16, 1)
    limit_db = -40 + 2.5 * np.repeat(rng.standard_normal((64, band.shape[2])), 16, 0)
    loudness = power.sum(1, keepdims=True).max(0)
    faint = (band.max(0) < loudness * invert_db(limit_db) ** 2) & (hz[:1024, None] > 8800)
    kept = np.concatenate([~faint, ~faint[-1:]])
    return signal.istft(z * kept, SR, nperseg=2048)[1][:, :N]


def low_pass(x):
    return signal.sosfilt(signal.butter(12, 15570, fs=SR, output="sos"), x)


def record(dry):
    squeezed = 1.257 * np.tanh(dry / 1.904)
    thin = signal.sosfilt(signal.butter(2, 120, "highpass", fs=SR, output="sos"), squeezed)
    thin = signal.sosfilt(signal.butter(12, 14400, fs=SR, output="sos"), thin)
    finished = np.clip(starved(thin), -1, 1)
    return low_pass(finished)


dry = scene()
out = record(dry)
output_pcm(out)
```